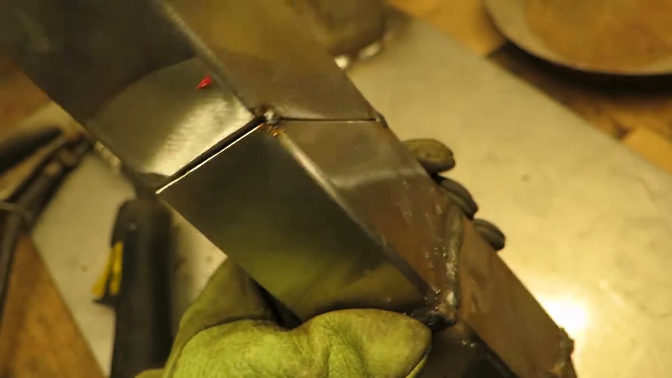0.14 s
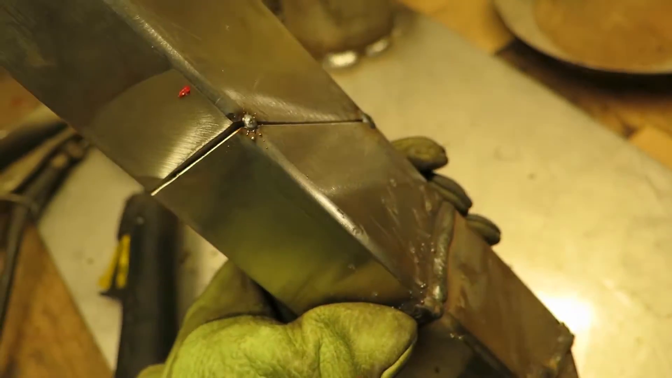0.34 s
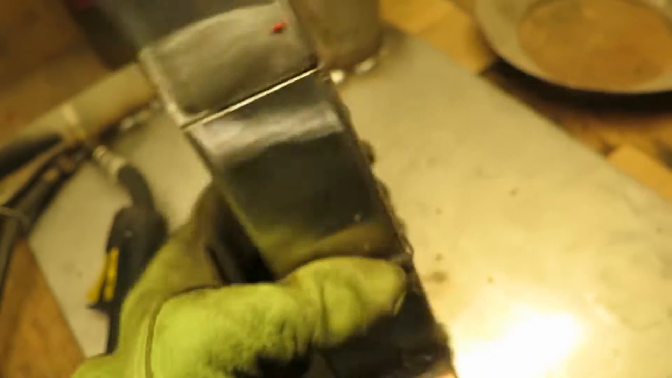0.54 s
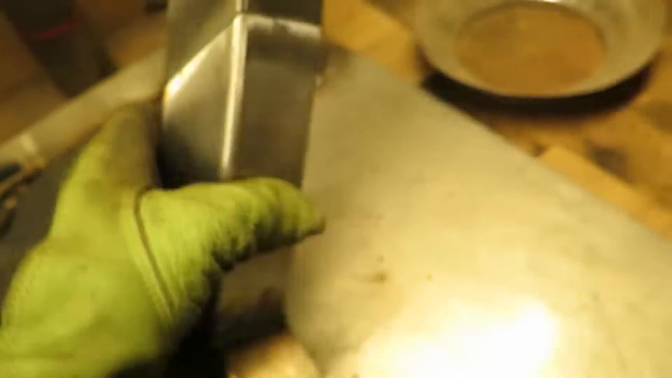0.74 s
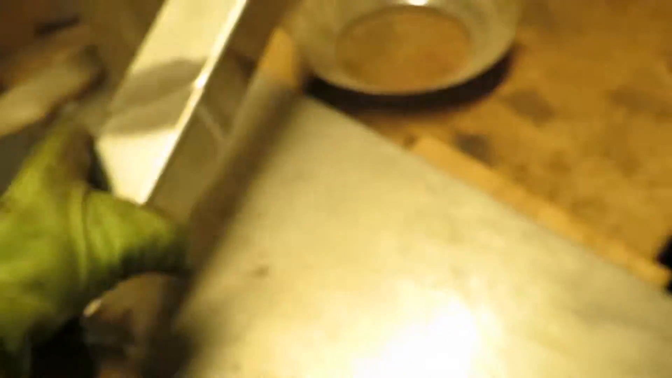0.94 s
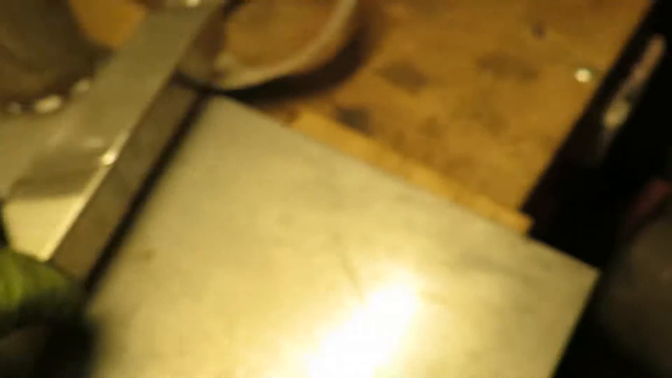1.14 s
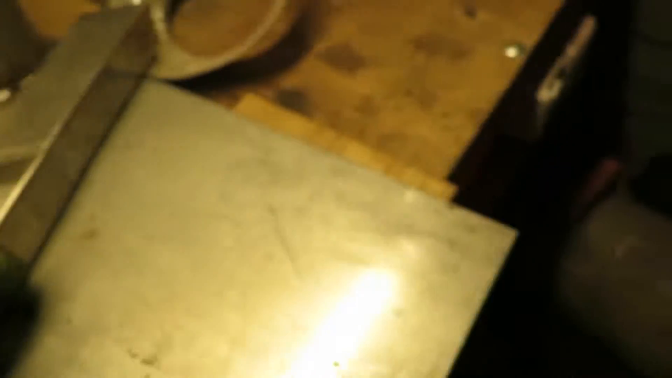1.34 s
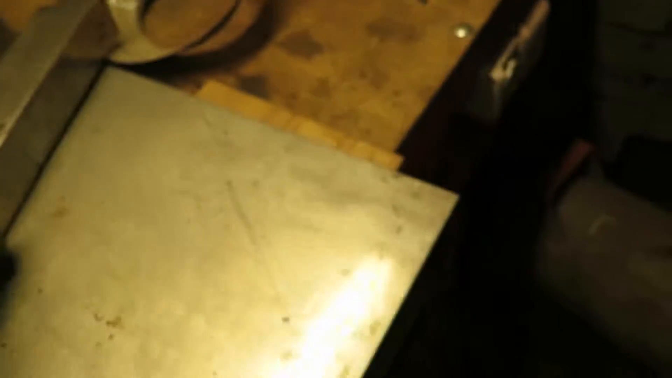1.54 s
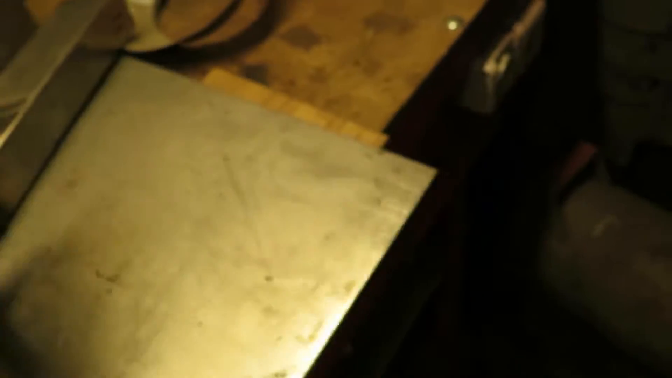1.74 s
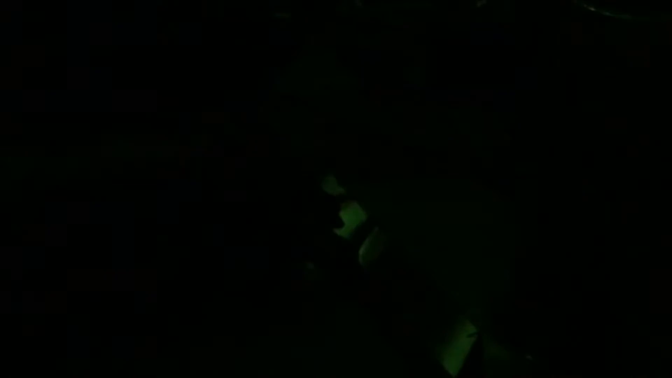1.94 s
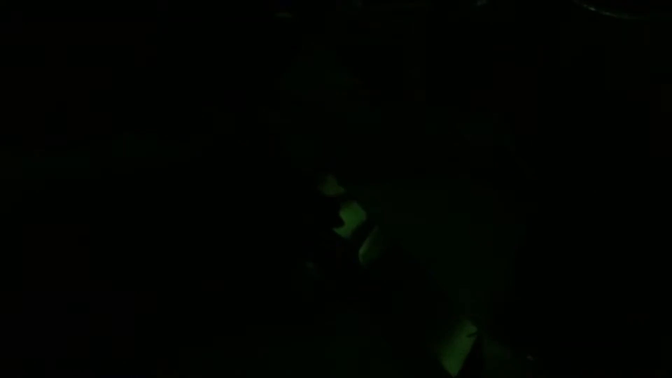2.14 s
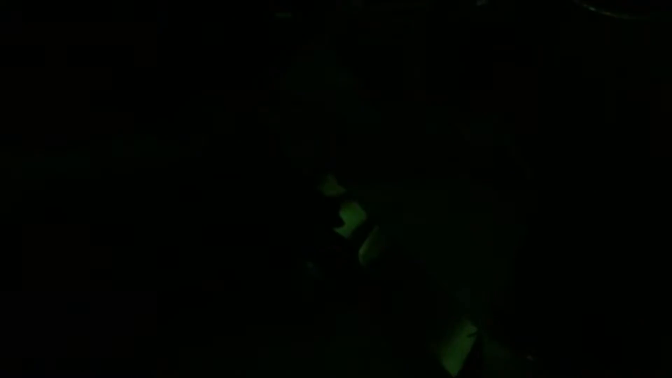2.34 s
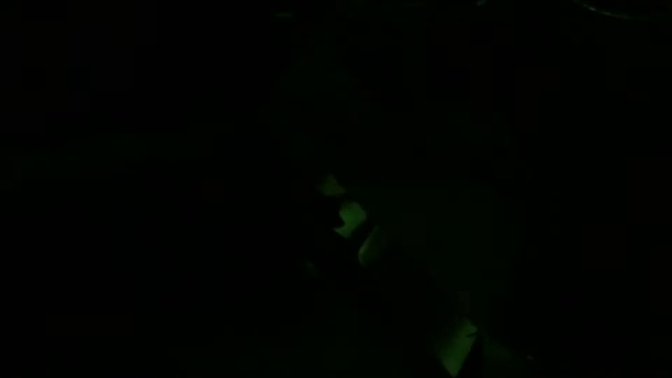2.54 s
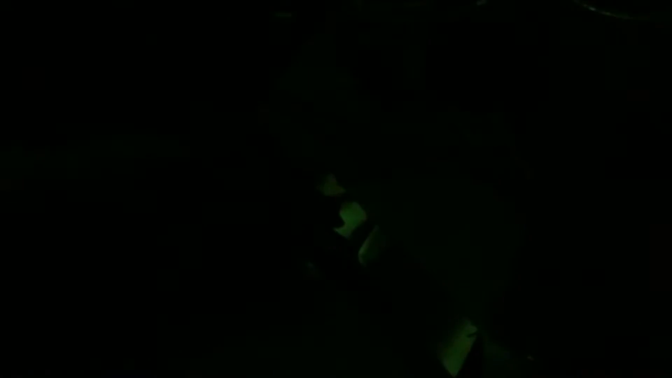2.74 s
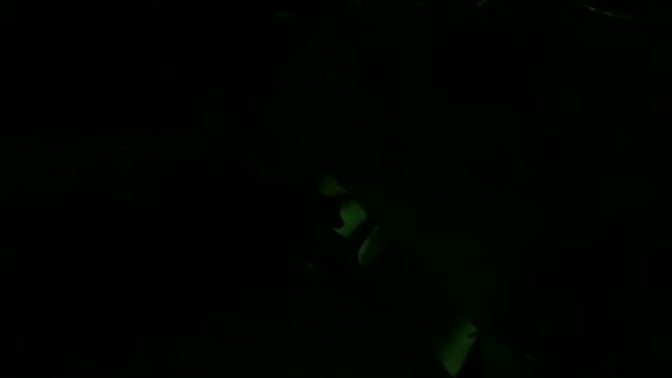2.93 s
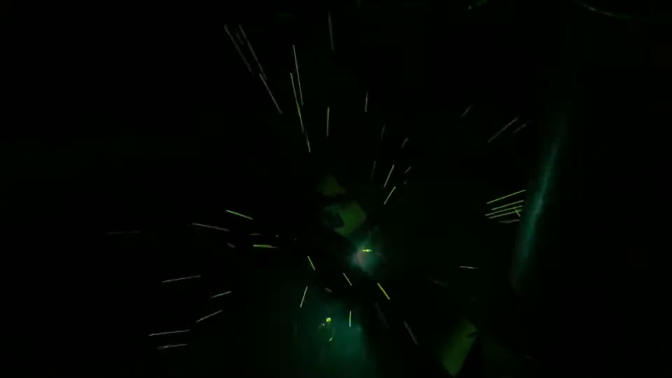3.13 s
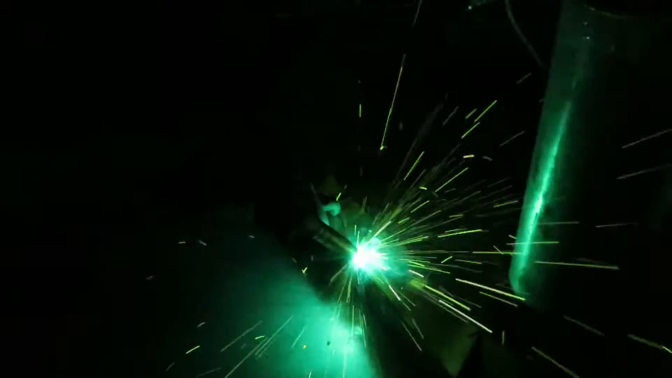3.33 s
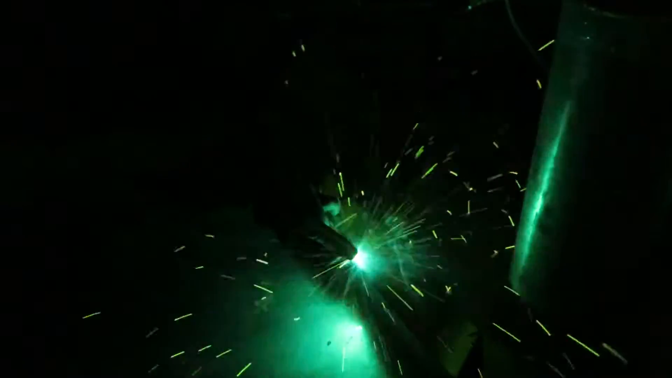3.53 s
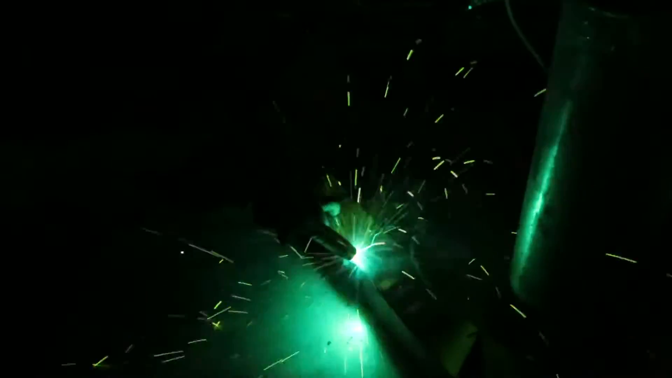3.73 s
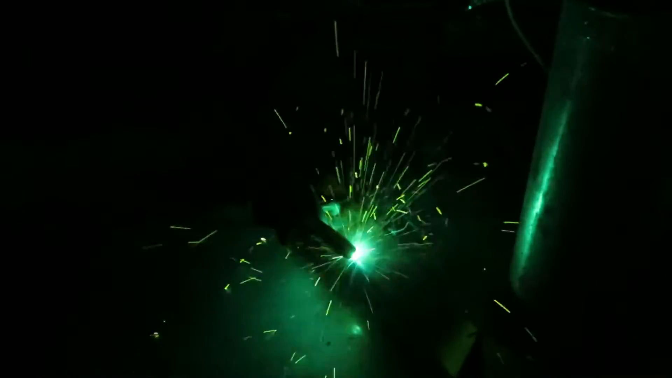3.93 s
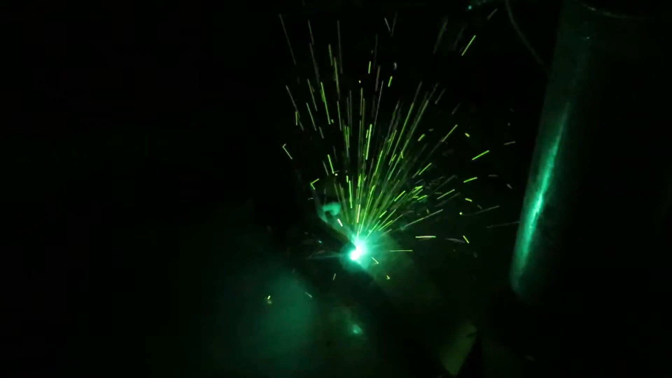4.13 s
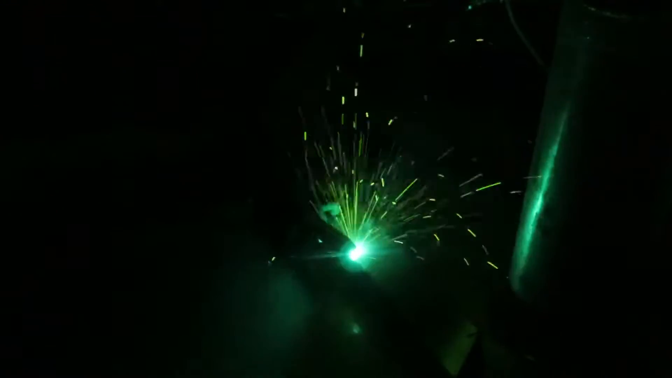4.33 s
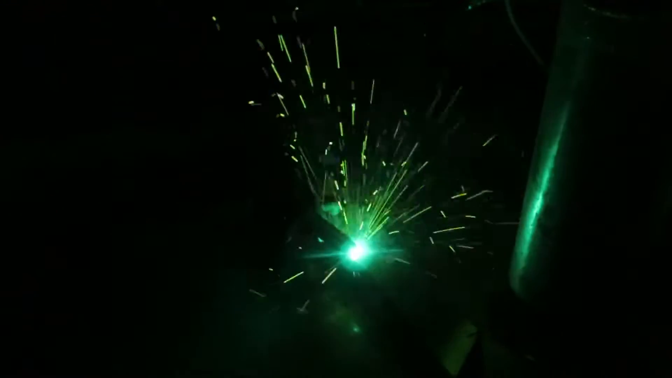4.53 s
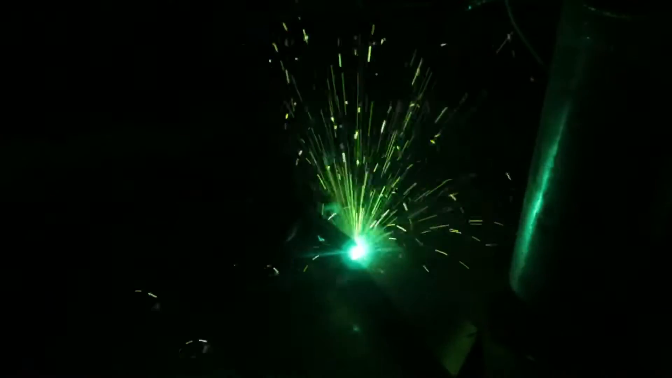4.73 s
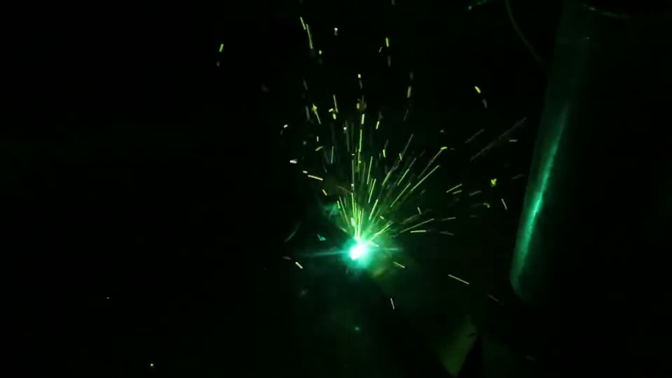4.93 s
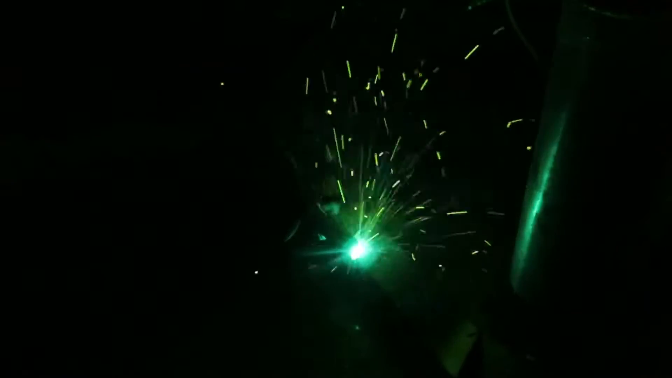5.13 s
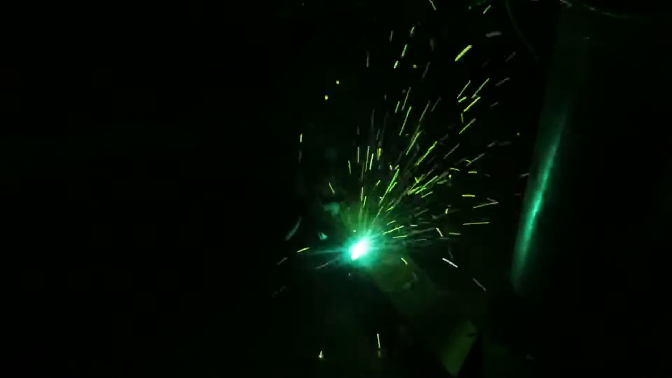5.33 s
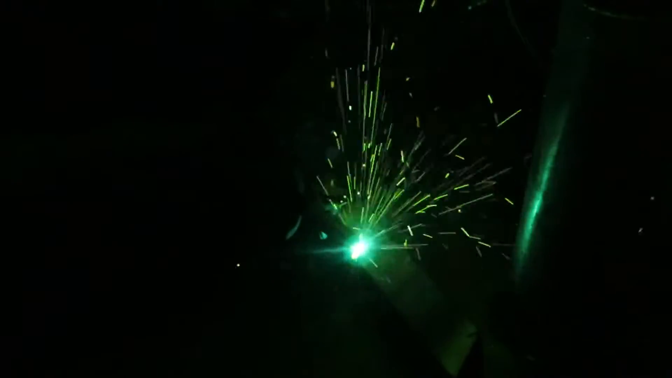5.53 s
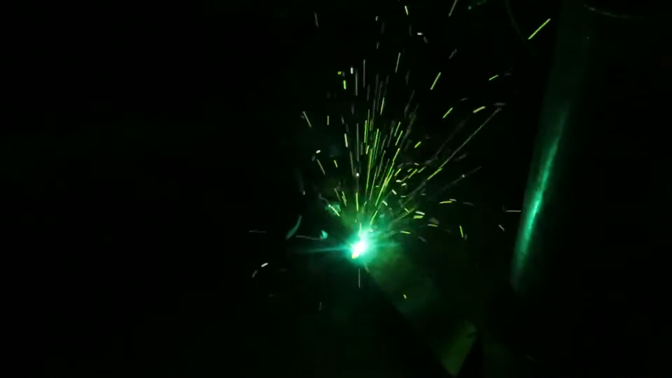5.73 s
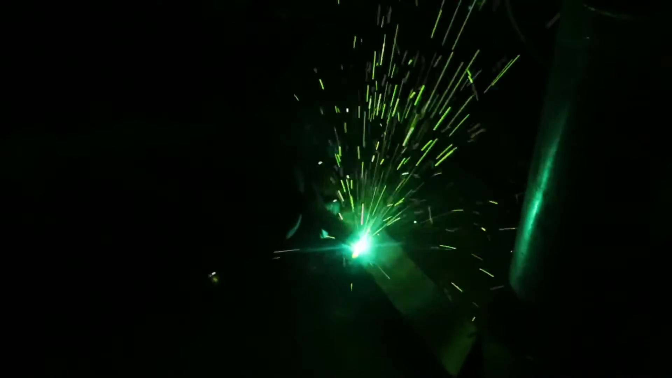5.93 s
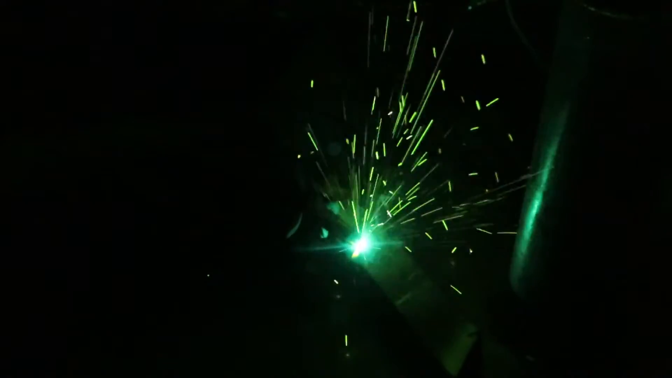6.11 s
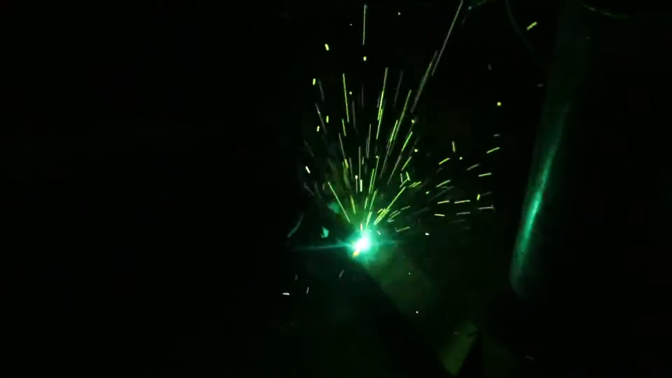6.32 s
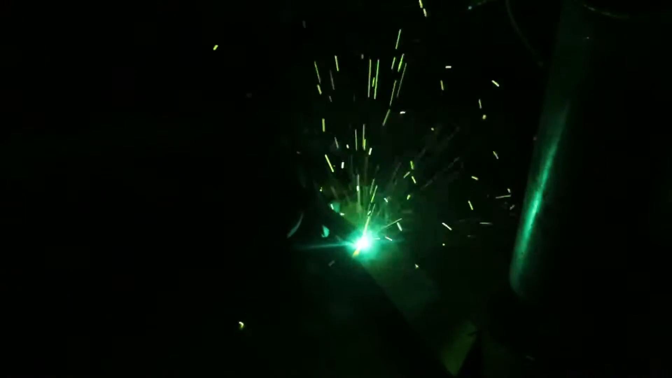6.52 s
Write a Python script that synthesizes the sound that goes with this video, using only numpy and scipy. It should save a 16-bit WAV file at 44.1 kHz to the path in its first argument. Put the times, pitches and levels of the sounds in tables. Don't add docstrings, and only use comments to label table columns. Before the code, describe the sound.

A gloved hand scrapes and knocks a hollow metal section on a bench, then a welder hums, hisses gas and strikes into steady crackling sizzle.

```python
import sys
import numpy as np
from scipy import signal
from scipy.fft import rfft, irfft
from scipy.io import wavfile
from scipy.ndimage import uniform_filter1d

SR = 44100
rng = np.random.default_rng(int(sys.argv[2]) if len(sys.argv) > 2 else 0)


def gain_from_decibels(decibels):
    exponent = np.asarray(decibels, float) / 20
    return 10 ** exponent


def wav_out(sig):
    wavfile.write(sys.argv[1], SR, np.round(np.clip(np.atleast_2d(sig).T, -1, 1) * 32767).astype(np.int16))


N = 294147
T = np.arange(N) / SR
HZ = np.fft.rfftfreq(N, 1 / SR)

# f/Hz, density/dB
SHOP_SPECTRUM = [(15, -33), (25, -4.5), (240, -4.5), (282, -11), (314, -1), (378, -13), (549, -5),
                 (959, -15), (1130, -7), (1290, -16.5), (1680, -14), (2190, -18), (14500, -26)]
# t/s, level/dB
SHOP_LEVEL = [
    (0, -44),
    (.3, -41),
    (.6, -38.5),
    (1.6, -31),
    (1.91, -45),
]
# t/s, peak level/dB, t60/s, brightness/dB
SCUFFS = [(0.056, -28, 0.28, 1), (.182, -38, .2, 0), (.245, -24.5, .3, -4), (0.3646, -28, 0.14, -1),
          (0.5112, -26.5, 1, -1.5), (0.619, -20, 0.79, 3), (.6915, -19, .2, -12), (0.7225, -1, 0.15, 0.5),
          (0.8435, -16.5, 0.25, 2), (.9, -19.5, 0.18, 2), (0.9832, 0, 0.054, -9), (1.1762, -12, .1, -11),
          (1.1917, -9, 0.1, -8), (1.2207, -5, 0.085, 3.5), (1.25, -24, 0.12, 2), (1.283, -14, 0.46, 0.5),
          (1.348, -10, 0.33, 0.5), (1.39, -20, 0.11, -5), (1.4374, -9.5, 0.18, 2.5), (1.485, -4, 0.11, -13),
          (1.526, -14, 0.12, 2), (1.56, -33, 0.18, 3), (1.6107, -17.5, 0.13, 0), (1.715, -29, 0.092, 4),
          (1.8063, -20, 0.18, 0.5), (1.9145, -29, 0.1, 2)]
# t/s, friction level/dB
DRAG_LEVEL = [
    (.56, -42),
    (.6, -50),
    (.645, -36),
    (.69, -36),
    (.735, -18),
    (.79, -29),
    (.97, -35.5),
    (.995, -18),
    (1.12, -31.5),
              (1.16, -32),
    (1.23, -20),
    (1.285, -32),
    (1.55, -23),
    (1.7, -38.5),
    (1.72, -36),
    (1.79, -39.5),
    (1.815, -31),
    (1.905, -39),
]
# f/Hz, width/Hz, level/dB
SECTION_MODES = [(75, 13, -7), (183, 41, 4), (467.7, 14, 25), (544, 20, -4), (628, 4.7, -14),
                 (817, 29, -16), (1690, 4.7, -31), (2426, 29, -20)]
# f/Hz, density/dB
BENCH_SPECTRUM = [(18, -52), (30, -40), (64, -2), (225, -7), (277, 2), (359, -1.5), (546, 3), (673, 0),
                  (830, -2.5), (921, -7.5), (1200, -12), (12300, -20.5), (15500, -30.5)]
# t/s, level/dB
SING_LEVEL = [
    (.615, -36),
    (.63, -29),
    (.69, -34),
    (.72, -30),
    (.75, -45),
]
# f/Hz, width/Hz, lift/dB
WALL_MODES = [(1100, 40, 12), (2460, 50, 14), (3170, 50, 17), (4180, 70, 18), (4500, 60, 8)]
# t/s, f/Hz, level/dB
SQUEAK = [
    (.62, 1680, -60),
    (.64, 1677, -33),
    (.68, 1680, -36),
    (.705, 1690, -23),
    (.73, 1690, -45),
]
# t/s, boom level/dB, t60/s, thud re boom/dB
SHOVES = [(.65, -34, 0.63, -16), (.7, -25, 0.48, -16), (.73, -17, 0.4, -2.5), (0.773, -14, 0.55, -12),
          (.86, -17, 0.41, -7.5), (.99, -11, .6, -17), (1.19, -22.5, 0.62, -11.5), (1.23, -17.5, 0.24, -27),
          (1.35, -23, 1, -9), (1.5, -22, 0.88, -10), (1.55, -27, 0.59, -9), (1.72, -29, 0.83, -11),
          (1.81, -31, 0.97, -2.5)]
# t/s, peak level/dB, main mode f/Hz, t60/s
KNOCKS = [(0.725, -2.5, 539, 0.062), (0.772, -2.5, 285, 0.087), (0.781, -10, 633, 0.046),
          (0.841, -7, 830, 0.068), (0.861, -10, 535, 0.066), (0.885, -12, 824, 0.19),
          (0.904, -11.5, 567, 0.24), (0.988, -10, 550, 0.054), (1.003, -7, 532, 0.056),
          (1.044, -7, 819, 0.24), (1.061, -10, 484, 0.19), (1.084, -14, 560, 0.087),
          (1.173, -10, 567, 0.091), (1.189, -5.5, 793, 0.037), (1.223, -8, 264, 0.12),
          (1.289, -13, 455, 0.078), (1.433, -6, 442, 0.038), (1.489, -8.5, 512, 0.081),
          (1.523, -7.5, 829, 0.12), (1.564, -8, 304, 0.099), (1.64, -16, 311, 0.14),
          (1.741, -19.5, 299, 0.15), (1.806, -19.5, 841, 0.19), (1.848, -22, 556, 0.055)]
# t/s, peak level/dB, main mode f/Hz, t60/s
CLANGS = [
    (0.7017, -13.5, 1080, 0.11),
    (0.7278, -11, 1020, 0.046),
    (1.2227, -2.5, 1263, 0.041),
    (1.224, -8, 2290, .03),
    (1.226, -4, 624, .05),
    (1.2277, -8, 1610, 0.045),
    (1.2603, -15, 1215, 0.088),
    (1.293, -13, 1180, 0.038),
]
# t/s, level/dB
MACHINE_LEVEL = [
    (1.91, -24.5),
    (1.93, -32.5),
    (2.94, -33),
    (3.07, -35.5),
    (3.238, -35),
    (3.258, -57.5),
    (3.346, -35),
    (3.4, -79),
]
# f/Hz, density/dB
FAN_SPECTRUM = [(15, -30), (25, -12), (120, -3), (216, -6.5), (267, -17), (561, -14), (641, -11.5),
                (732, -15.5), (956, -11.5), (1090, -7), (2010, -19), (2300, -17.5), (7020, -24.5),
                (11600, -22.5), (14400, -32.5)]
# f/Hz, width/Hz, lift/dB
WHINE = [(4130, 60, 5), (7760, 70, 1), (10636, 30, 7), (11189, 47, 18), (12100, 65, 16), (12268, 28, 8),
         (12940, 70, 13), (13930, 60, 10), (13450, 400, -8)]
# f/Hz, level/dB
HUM = [(45.5, -35.5), (100.5, -36), (134.6, -41), (640.6, -40.5)]
# t/s, level/dB
GAS_LEVEL = [
    (2.943, -21.5),
    (2.985, -12),
    (3.213, -22),
    (3.22, -17),
]
# t/s, level/dB
GAS_DUCKED = [
    (3.248, -51),
    (3.26, -29),
    (3.28, -43),
    (3.283, -39),
]
# f/Hz, density/dB
NOZZLE_SPECTRUM = [(880, -24), (1500, -11.5), (1950, -20), (2830, -19.5), (3250, -18), (4140, -7.5),
                   (4570, -10.5), (5090, -0.5), (6690, -9), (8290, -5.5), (10700, -11), (12000, -1.5),
                   (13400, -11), (14900, -11), (15500, -26)]
# f/Hz, width/Hz, lift or dip/dB
NOZZLE_CUP = [(3360, 300, -6), (4240, 150, 6), (4890, 130, 4), (5700, 120, -7), (10050, 80, 12),
              (11870, 200, 6.5), (8300, 400, 1)]
# t/s, peak level/dB, f/Hz, t60/s
VALVE = [
    (2.945, -16, 550, 0.041),
    (2.957, -10.5, 950, 0.03),
]
# t/s, peak level/dB
STRIKES = [
    (3.2285, 10.5),
    (3.2903, 10),
    (3.331, 2),
]
# t/s, level/dB
ARC_LEVEL = [(3.3, -19), (3.6, -20.5), (3.66, -25.5), (3.72, -21), (4.43, -24.5), (4.58, -24.5),
             (4.7, -27.5), (4.93, -20), (5.03, -22), (5.15, -22.5), (5.22, -24.5), (5.45, -26), (5.7, -24),
             (5.83, -22), (6.1, -20), (6.22, -24.5), (6.32, -20.5), (6.67, -22)]
# t/s, rate/Hz
SHORT_RATE = [
    (3.29, 195),
    (3.6, 186),
    (3.8, 143),
    (4.1, 145),
    (4.25, 177),
    (4.6, 186),
    (5.3, 195),
    (5.8, 224),
    (6.1, 203),
    (6.67, 196),
]
# relight t/s, level change/dB, length/s
STUTTERS = [(3.331, -14, 0.051), (3.399, -8.5, 0.031), (3.43, -6, 0.043), (3.79, -6.5, 0.073),
            (3.85, -5.5, 0.026), (4.841, -5.5, 0.056), (4.918, -8, 0.033), (4.992, -9, 0.02),
            (5.25, -4, 0.023), (5.528, 3.5, 0.022), (5.705, -3, 0.026), (6.142, -5, 0.029),
            (6.405, -5.5, 0.038)]
# t/s, peak level/dB
POPS = [(3.3954, -13), (3.4266, -16), (3.9577, 0.5), (4.059, -3.5), (4.072, -3.5), (4.335, -2),
        (4.3586, -7), (4.7144, -1.5), (4.8574, -17), (4.9197, -2), (4.9967, -6), (5.0345, -14), (5.0798, 3),
        (5.127, -1.5), (5.153, -2), (5.299, -3), (5.3357, -2), (5.3873, 2), (5.549, -1.5), (5.7171, -1),
        (5.751, -4), (5.8213, 1), (5.8953, 0.5), (6.105, 0), (6.144, -20), (6.2038, -7), (6.2951, 3),
        (6.5588, 1.5), (6.6186, -6)]
# f/Hz, density/dB
PLASMA_EARLY = [(1760, -32), (3000, -12), (3260, -6), (3560, -5.5), (4140, -5), (4560, -6), (5060, -5),
                (5720, -8), (8020, -2.5), (9010, -9), (9460, -4.5), (10500, -0.5), (12400, -0.5),
                (14600, -1.5), (15500, -25)]
# f/Hz, density/dB
PLASMA_LATE = [(1760, -19), (3000, -19), (3280, -11.5), (3760, -15.5), (4170, -13), (4660, -13.5),
               (5090, -12.5), (5530, -15), (6610, -11.5), (7280, -11), (8950, -10.5), (10400, -7),
               (11200, -11.5), (12100, -1.5), (15500, -15)]
# f/Hz, width/Hz, level/dB
SHEET_MODES = [(7560, 33, 25), (9800, 54, 0), (10580, 320, 16), (11400, 26, -6), (11690, 78, 31),
               (11100, 87, 0), (12020, 110, -5), (13900, 120, -14)]
# f/Hz, width/Hz, dip/dB
ECHO_GAPS = [(850, 130, -13), (1760, 190, -15), (3350, 240, -15), (4520, 120, -9), (5800, 240, -11),
             (6550, 240, -12), (8850, 200, -8)]
# f/Hz, density/dB
RUMBLE_SPECTRUM = [(15, -41), (25, -36), (124, -11.5), (169, -9.5), (423, -11.5), (469, -5), (521, -14.5),
                   (668, -4.5), (757, -7), (1120, -4.5), (1470, -6), (1740, -8.5), (2140, -5.5), (3240, -5),
                   (3600, 6), (4680, -40), (7920, -120)]
# t/s, peak level/dB
THUMPS = [(3.798, -60), (4.207, -62), (4.395, -63), (4.62, -63), (4.736, -57), (5.06, -50), (5.35, -56),
          (5.602, -54), (5.66, -54), (5.756, -54), (6.104, -52), (6.275, -56), (6.36, -60), (6.6, -60)]
# t/s, level/dB, length/s
FEEDER = [
    (4.0, -42, .2),
    (4.42, -50, .05),
    (4.974, -38, 0.12),
    (5.12, -41, 0.15),
    (5.45, -44, .2),
    (5.75, -37, 0.18),
]

QUIET_TOP_HZ, HANDLING_TOP_HZ, GAS_TOP_HZ = 14450, 15100, 15250
RUB_SLOPE, RUB_PIVOT_DB = 1.22, -17
SHOVE_RISE_S = 0.019
CRACK_DB, CRACK_T60_S = -8, .03
HUM_REF_DB = -32.5
STRIKE_T60_S, POP_T60_S = 0.035, 0.071
RELIGHT_S = 0.0079
SPIKE_DB, SPIKE_SPREAD_DB = -7, 3.3
TRAVEL_S = (4.895, 4.93)
ROAR_DB, RUMBLE_DB = (-8.5, -10.5), (-36.5, -41)
ARC_PIVOT_DB, ROAR_SLOPE, RUMBLE_SLOPE = -21, 0.027, 1.13
FEEDER_HZ, FEEDER_FADE_DB_PER_S = 476, 90


def unit(x):
    return x / np.sqrt(np.mean(x ** 2))


def curves(table, fade_s=0.0032):
    s, *columns = np.transpose(table)
    gate = np.clip(np.minimum(T - s[0], s[-1] - T) / fade_s, 0, 1)
    return [gate] + [np.interp(T, s, column) for column in columns]


def decay(t, t60_s):
    return np.exp(-np.log(1000) * t / t60_s)


def shape(table):
    hz, db = np.transpose(table)
    return gain_from_decibels(np.interp(np.log(HZ + 1), np.log(hz), db))


def resonance(hz, width_hz):
    return 1 / (1 + (2 * (HZ - hz) / width_hz) ** 2)


def peaks(table, lift_db):
    return 1 + sum(gain_from_decibels(lift_db + .12 * db) * resonance(hz, width) for hz, width, db in table)


def bumps(table):
    return gain_from_decibels(sum(db * resonance(hz, width) for hz, width, db in table))


def band(x, gain, lo_hz=0, hi_hz=SR):
    low_cut = 1 + (lo_hz / (HZ + 1)) ** 16
    high_cut = 1 + (HZ / hi_hz) ** 16
    return unit(irfft(rfft(x) * gain / np.sqrt(low_cut * high_cut), N))


def walk(rate_hz):
    hold = int(SR / rate_hz)
    steps = np.repeat(rng.standard_normal(N // hold + 1), hold)
    return unit(uniform_filter1d(steps, hold)[:N])


def pair(alike_hz):
    mid, side = rng.standard_normal((2, N))
    side = irfft(rfft(side) * HZ / np.hypot(HZ, alike_hz), N)
    return np.array([mid + side, mid - side])


def echoes(x, t60_s, direct_db, count=1):
    t = T[:int(t60_s * SR)]
    place = (T - 2.9) / (T[-1] - 2.9) * count
    out = 0
    for k in range(count + 1):
        tail = rng.standard_normal((2, SR))[:, :len(t)] * decay(t, t60_s)
        tail[:, 0] += gain_from_decibels(direct_db)
        response = rfft(tail, N)
        response /= np.sqrt(uniform_filter1d(abs(response) ** 2, size=N // 150))
        share = np.cos(np.pi / 2 * np.clip(place - k, -1, 1))
        out = out + irfft(rfft(x * share) * response, N)
    return out


def bursts(table, crest=5.4, rise_s=0.0043):
    out = np.zeros(N)
    for s, db, t60 in table:
        rise = np.clip((T - s) / rise_s + .5, 0, 1)
        out += rise * gain_from_decibels(db) / crest * decay(np.maximum(T - s, 0), t60)
    return out


def rings(table, left_db=0):
    out = np.zeros(N)
    for s, db, hz, t60 in table:
        start = int(s * SR)
        t = T[:min(int(t60 * SR), N - start)]
        phase = 2 * np.pi * hz * t
        ring = np.sin(phase) + 0.27 * np.sin(1.3 * phase) + 0.11 * np.sin(0.68 * phase)
        out[start:start + len(t)] += 0.54 * gain_from_decibels(db) * ring * decay(t, t60) * np.minimum(t / 0.0013, 1)
    return out * gain_from_decibels(np.array([[left_db], [-left_db]]) / 2)


def shop():
    gate, db = curves(SHOP_LEVEL, fade_s=0.00046)
    fan_line = peaks([(1132, 15, 0)], 6.6)
    air = band(pair(680), shape(SHOP_SPECTRUM) * fan_line * (HZ < QUIET_TOP_HZ))
    return gate * gain_from_decibels(db + 0.27 * walk(8.7)) * air


def drag():
    gate, clatter_db = curves(DRAG_LEVEL, fade_s=0.027)
    rub_db = RUB_PIVOT_DB + RUB_SLOPE * (clatter_db - RUB_PIVOT_DB)
    push, bump = shoves()
    slip = gain_from_decibels(2.0 * walk(60.4))
    body = shape(BENCH_SPECTRUM) * peaks(SECTION_MODES, 7.8)
    top = shape(BENCH_SPECTRUM) * (HZ < HANDLING_TOP_HZ)

    thud = band(pair(480), body, 0, 397) * (bump + gain_from_decibels(-53)) * gain_from_decibels(0.5)
    boom = band(pair(2200) * slip, body, 350, 1700) * push * gain_from_decibels(-2.5)
    clatter = band(pair(3100) * gain_from_decibels(1.9 * walk(50.04)), body, 933, 3820)
    rub = band(pair(1500) * gain_from_decibels(3.8 * walk(39.8)), top, 3140)
    edge = band(pair(1500), top, 7400) * np.where(T > 1.15, 1, .4)
    sliding = gate * (thud + boom + clatter * gain_from_decibels(clatter_db - 0.5) + rub * gain_from_decibels(rub_db - 5.0))

    dull = bursts([row[:3] for row in SCUFFS], rise_s=.006)
    bright = bursts([(s, db + lift_db, t60) for s, db, t60, lift_db in SCUFFS], rise_s=0.0066)
    return sliding + 0.41 * clatter * dull + (1.24 * rub + 1.23 * edge) * bright


def glove_sing():
    gate, db = curves(SING_LEVEL, fade_s=.008)
    return gate * gain_from_decibels(db) * band(pair(2000), bumps(WALL_MODES), 900, 5000)


def squeak():
    gate, hz, db = curves(SQUEAK)
    return gate * gain_from_decibels(db) * np.sin(2 * np.pi * np.cumsum(hz) / SR)


def shoves():
    boom_power, thud_power = 0, 0
    for s, db, t60, thud_db in SHOVES:
        swell = np.clip((T - s) / SHOVE_RISE_S + 1, 0, 1) ** 2
        push = gain_from_decibels(db) * swell * decay(np.maximum(T - s, 0), t60)
        boom_power = boom_power + push ** 2
        thud_power = thud_power + (push * gain_from_decibels(thud_db)) ** 2
    return np.sqrt(boom_power), np.sqrt(thud_power)


def knocks():
    contacts = [(s, db + CRACK_DB, CRACK_T60_S) for s, db, hz, t60 in KNOCKS + CLANGS]
    envelope = bursts(contacts, crest=3.9, rise_s=0.00091)
    crack = band(pair(2500), shape(BENCH_SPECTRUM), 640, 6600) * envelope
    return crack + rings(KNOCKS, left_db=-2.5) + rings(CLANGS)


def machine():
    gate, db = curves(MACHINE_LEVEL, fade_s=0.017)
    colour = shape(FAN_SPECTRUM) * bumps(WHINE) * (HZ < QUIET_TOP_HZ)
    noise = rfft(pair(270) * gain_from_decibels(0.37 * walk(6.0))) * colour
    bass_power = np.mean(irfft(noise * (HZ < 250), N) ** 2)
    rush = irfft(noise, N) / np.sqrt(bass_power)
    blade_sag = np.interp(T, [2.88, 3.1], [1, .35])
    tones = 0
    for hz, line_db in HUM:
        phase = 2 * np.pi * np.cumsum(hz * (1 + 0.0036 * walk(30.1))) / SR
        lag = rng.uniform(-0.16, 1) * min(hz / 300, .6) * np.array([[1], [-1]])
        level = np.sqrt(2) * gain_from_decibels(line_db - HUM_REF_DB + 1.9 * walk(8.03))
        tones = tones + level * np.sin(phase + lag) * np.where(hz > 500, blade_sag, 1)
    return gate * gain_from_decibels(db) * (0.69 * rush + tones)


def gas():
    gate, db = curves(GAS_LEVEL + [(3.231, -19)] + GAS_DUCKED, fade_s=.001)
    turbulence = rng.standard_normal(N) * gain_from_decibels(1.2 * walk(150))
    jet = echoes(turbulence, 0.058, 6.7) + 0.3 * pair(500)
    colour = shape(NOZZLE_SPECTRUM) * bumps(NOZZLE_CUP) * (HZ < GAS_TOP_HZ)
    return gate * gain_from_decibels(db) * band(jet, colour) + rings(VALVE)


def arc_colours():
    late = np.clip((T - 4.5) / 0.23, 0, 1)
    early_colour = shape(PLASMA_EARLY) * (HZ < GAS_TOP_HZ + 150)
    late_colour = shape(PLASMA_LATE) * peaks(SHEET_MODES, -5.5)
    gaps = bumps(ECHO_GAPS)
    return [(1 - late, early_colour * gaps), (late, late_colour * gaps)]


def strikes_and_pops():
    strikes = [(s, db, STRIKE_T60_S) for s, db in STRIKES]
    envelope = bursts(strikes + [(s, db, POP_T60_S) for s, db in POPS])
    crack = echoes(rng.standard_normal(N), 0.018, 6.2, count=5)
    low = shape(RUMBLE_SPECTRUM) * bumps(ECHO_GAPS)
    out = band(crack, low, 0, 2700) * envelope ** 1.53 * gain_from_decibels(-9)
    for share, colour in arc_colours():
        out += np.sqrt(share) * envelope * band(crack, colour, 3350)
    return out


def hush(table, lead_s=0.022, depth=0.21):
    return np.prod([1 - depth * (T < s) * np.exp(-np.abs(s - T) / lead_s) for s, db in table], axis=0)


def stutter():
    return sum(db * np.interp(T, [s - length, s - RELIGHT_S, s], [0, 1, 0]) for s, db, length in STUTTERS)


def short_circuits():
    chance = rng.standard_normal((2000, 2))
    turns = np.cumsum(curves(SHORT_RATE)[1] * (T > SHORT_RATE[0][0])) / SR
    due = np.cumsum(np.exp(.22 * chance[:, 0]))
    at = np.searchsorted(turns, due[due < turns[-1]])
    strength = chance[:len(at), 1]
    snaps, spikes = np.zeros((2, N))
    snaps[at] = gain_from_decibels(1.3 * strength)
    spikes[at] = np.sign(chance[::-1, 0][:len(at)]) * gain_from_decibels(SPIKE_SPREAD_DB * strength)
    spikes = unit(echoes(spikes, .012, 12, count=6)) * gain_from_decibels(SPIKE_DB)
    puffs = signal.lfilter([1], [1, -np.exp(-1 / (0.0015 * SR))], snaps)
    near = unit(echoes(unit(rng.standard_normal(N) * puffs), .045, 12.5, count=4))
    return near, spikes


def sizzle():
    gate, db = curves(ARC_LEVEL, fade_s=0.001)
    gate = gate * hush(STRIKES + POPS)
    db = db + stutter()
    roar_db = np.interp(T, TRAVEL_S, ROAR_DB) + ROAR_SLOPE * (db - ARC_PIVOT_DB)
    rumble_db = np.interp(T, TRAVEL_S, RUMBLE_DB) + RUMBLE_SLOPE * (db - ARC_PIVOT_DB)

    near, spikes = short_circuits()
    far = unit(echoes(rng.standard_normal(N), .1, 6, count=3))
    plume = gain_from_decibels(0.56 * walk(30)) * (0.72 * near + spikes + far)

    draught = 0.61 * pair(300) * gain_from_decibels(2.8 * walk(12))
    rumble = 0.44 * near + spikes * np.array([[.7], [1.4]]) + .5 * far + draught
    low = shape(RUMBLE_SPECTRUM) * bumps(ECHO_GAPS)
    out = band(rumble, low, 0, 2575) * gate * gain_from_decibels(rumble_db + 2.5)
    for share, colour in arc_colours():
        roar = gain_from_decibels(roar_db) * band(plume, colour, 3090, 6520)
        steady = gain_from_decibels(db + 1.0) * (band(plume, colour, 7620) + roar)
        out += np.sqrt(share) * gate * steady
    return out


def arc():
    left_db = np.interp(T, [3.3, 6.6], [-.6, -2.4])
    return (strikes_and_pops() + sizzle()) * gain_from_decibels(np.array([left_db, -left_db]) / 2)


def thumps():
    sides_db = rng.uniform(-8, 8, len(THUMPS))
    return sum(rings([(s, db + 9, 45, .12)], left_db=side) for (s, db), side in zip(THUMPS, sides_db))


def feeder():
    loads_db = []
    for s, top_db, length in FEEDER:
        outside_s = np.maximum(np.abs(T - s) - length / 2, 0)
        loads_db.append(top_db - FEEDER_FADE_DB_PER_S * outside_s)
    db = np.max(loads_db, axis=0)
    whirr = np.sin(2 * np.pi * np.cumsum(FEEDER_HZ * (1 + .02 * walk(60))) / SR)
    return (T > ARC_LEVEL[0][0]) * gain_from_decibels(db - 9.0 + 2.7 * walk(25)) * whirr * np.array([[.8], [1.2]])


def scene():
    handling = drag() + glove_sing() + squeak() + knocks()
    return shop() + handling + machine() + gas() + arc() + thumps() + feeder()


def low_pass(x):
    return signal.sosfilt(signal.butter(12, 15500, fs=SR, output="sos"), x)


def record(dry):
    clipped = np.clip(dry, -1, 1)
    return low_pass(clipped)


dry = scene()
out = record(dry)
wav_out(out)
```